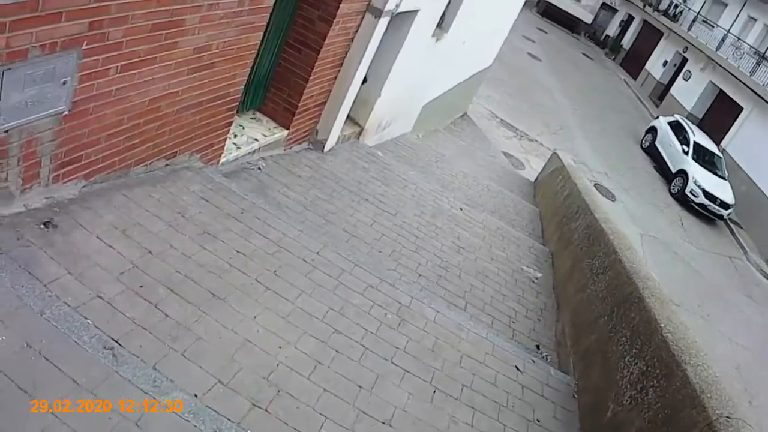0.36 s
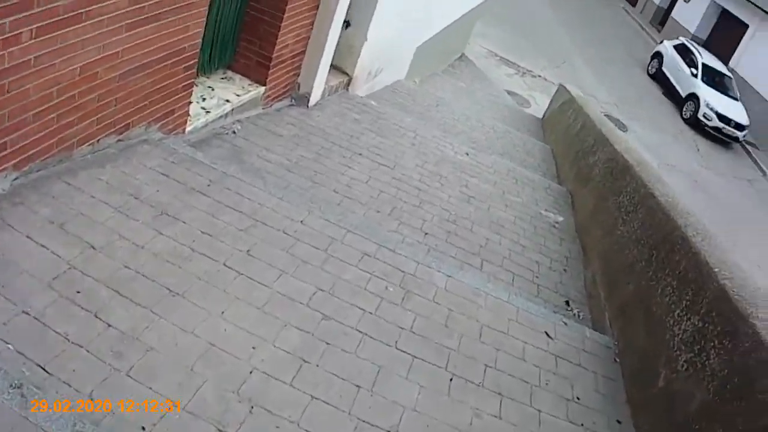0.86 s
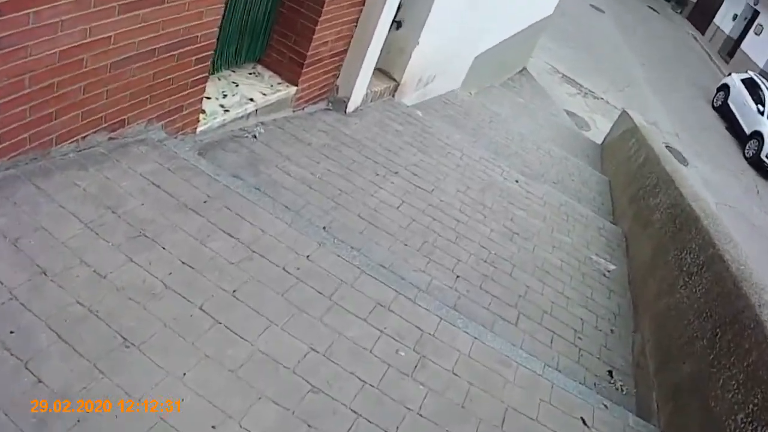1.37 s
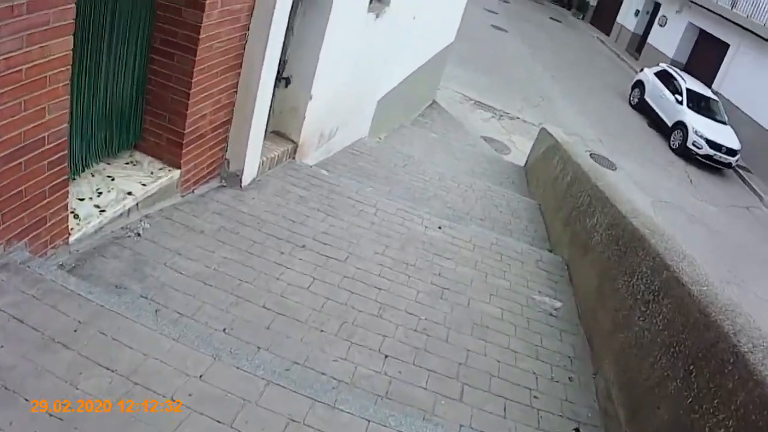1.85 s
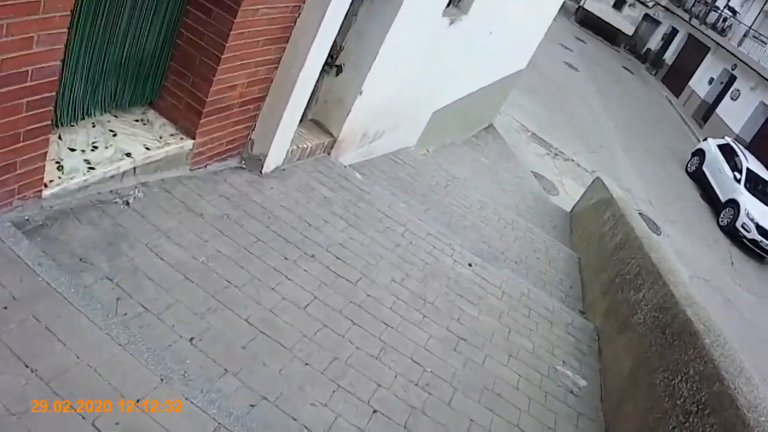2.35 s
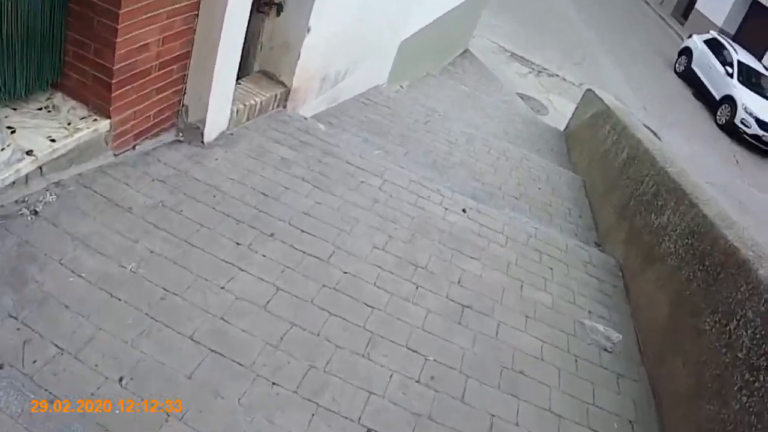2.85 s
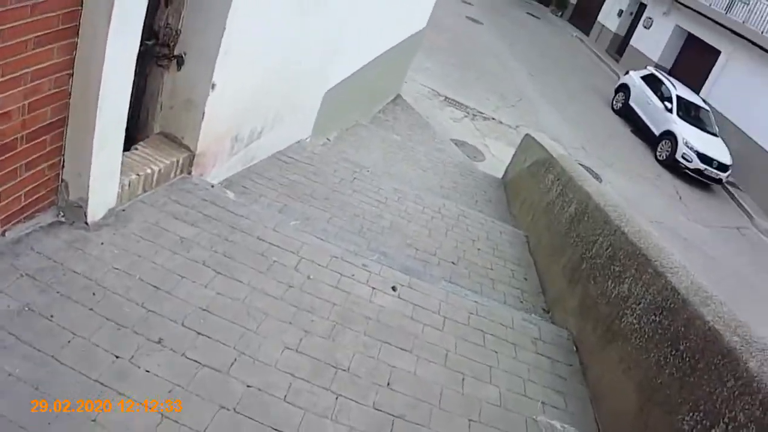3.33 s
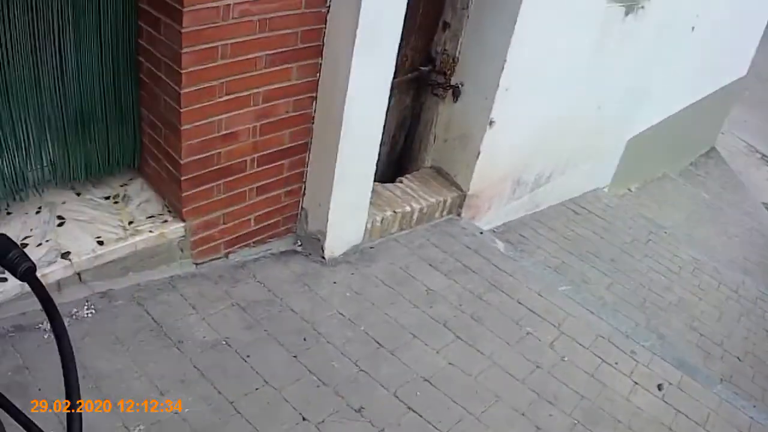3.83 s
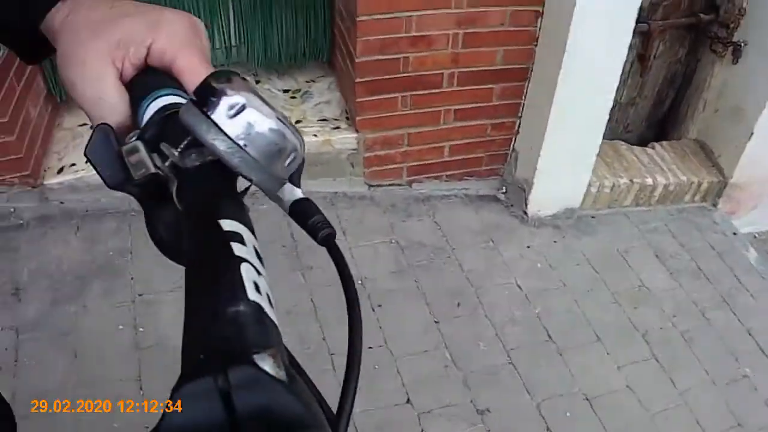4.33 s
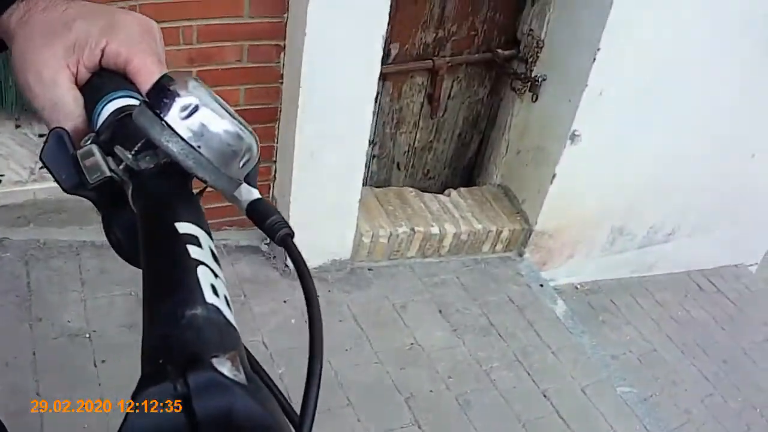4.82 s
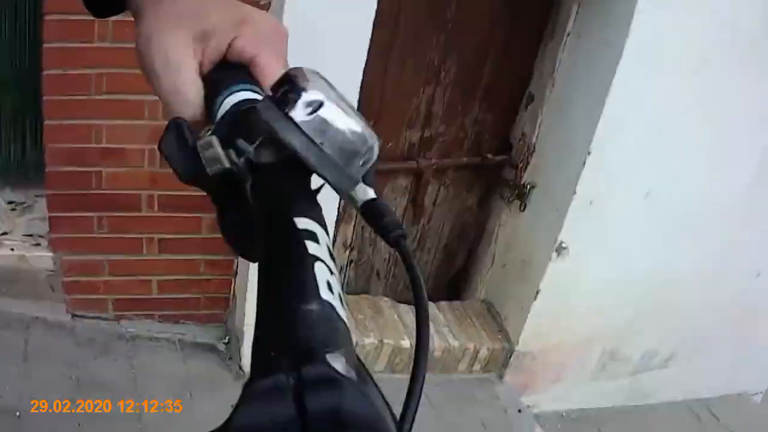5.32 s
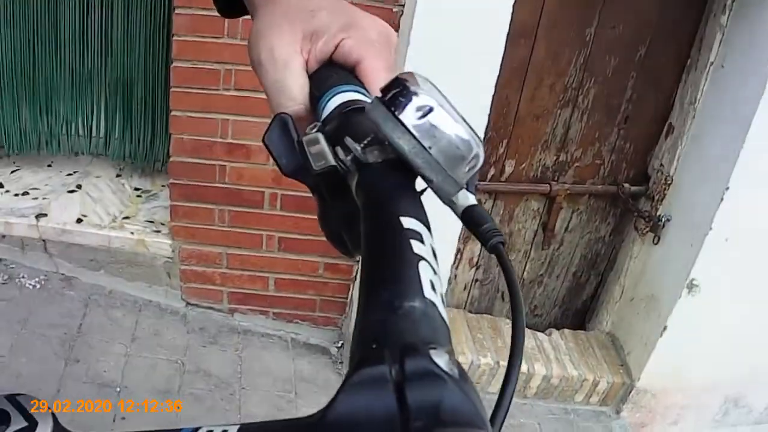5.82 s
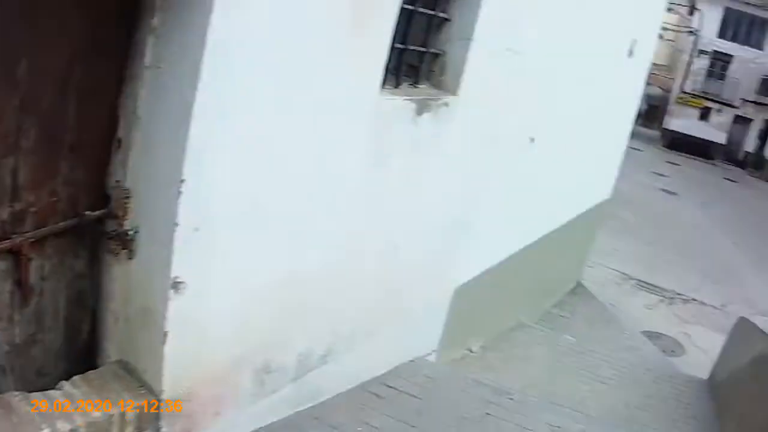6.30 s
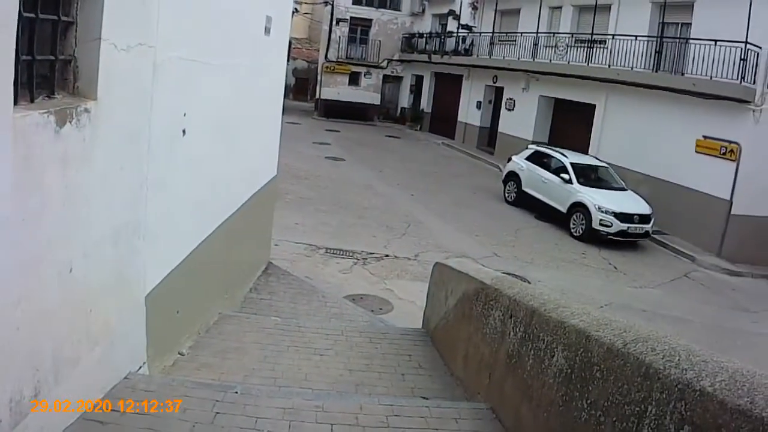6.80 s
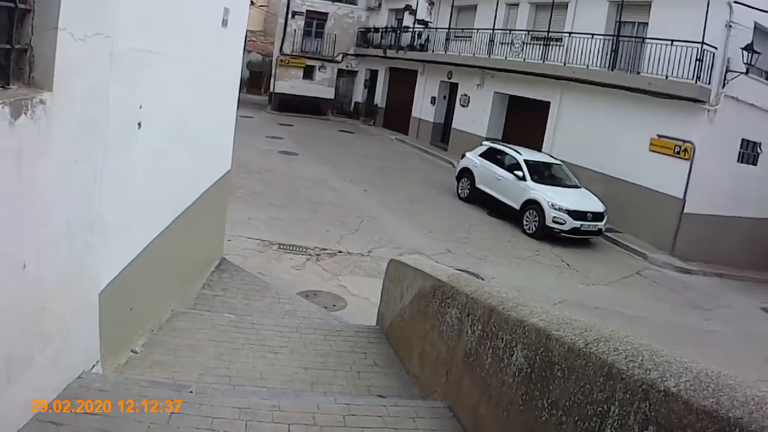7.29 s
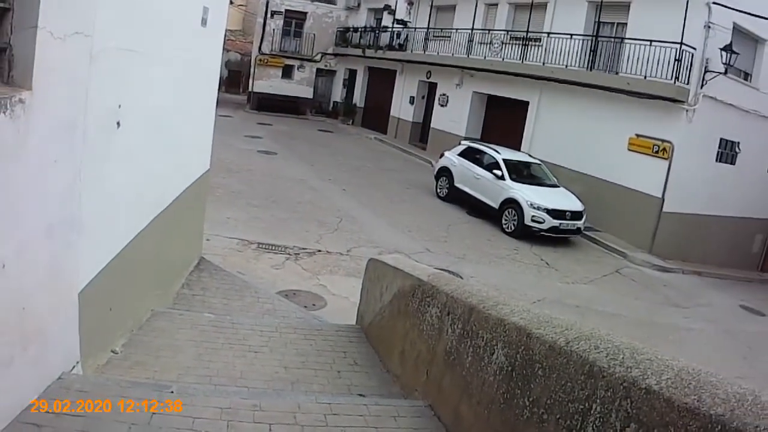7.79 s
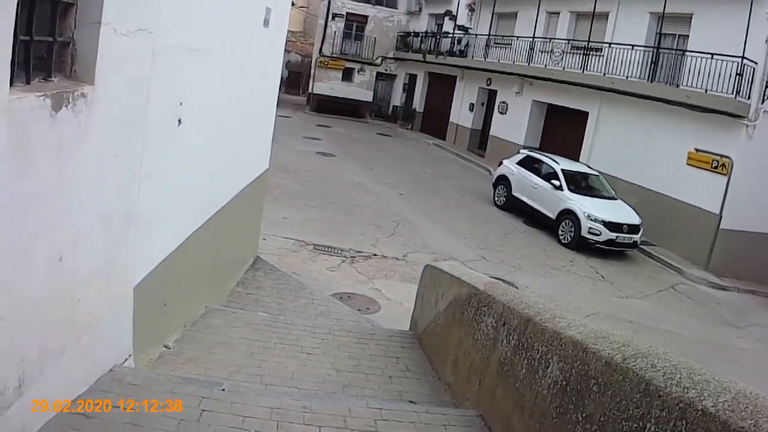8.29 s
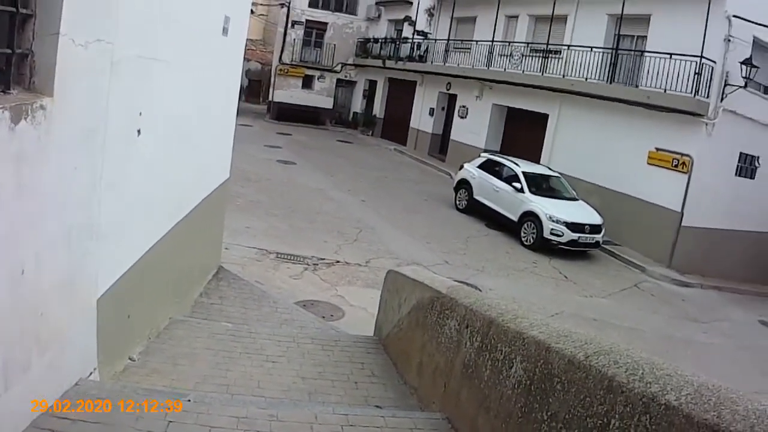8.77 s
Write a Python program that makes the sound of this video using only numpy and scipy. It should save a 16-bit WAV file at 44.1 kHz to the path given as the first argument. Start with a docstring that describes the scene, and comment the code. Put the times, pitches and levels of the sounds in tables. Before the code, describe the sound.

Quiet, regular metallic ticks of a bicycle wheel open the scene, broken by clusters of boxy knocks and low thumps from stone steps. A very faint bird chirps far off. The blows grow closer, overload in one brief loud crash, then turn to gritty rubbing and lighter knocks. Mono, muffled, close microphone in a plastic case, outdoors in a quiet street.

```python
"""A bicycle is walked down stone steps; a small camera in a closed plastic housing is clamped to its handlebar.
The freewheel ticks from the start, a far bird chirps between 1 and 2 s, and each landing jolts the frame.
Noisy contact forces ring banks of modes as knocks and thuds; a slow sine sways the handlebar after a landing.
From 5.3 s the hardest jolts overload the input; then sliding fingers and tyres rasp between softer blows.
Tyres rub in swells, strongest near 5.5 s, as shaken modes; hiss and a thin whine, filtered noise, run throughout."""
import sys
import numpy as np
from scipy import signal
from scipy.fft import rfft, irfft
from scipy.io import wavfile
from scipy.ndimage import map_coordinates

SR = 44100
rng = np.random.default_rng(int(sys.argv[2]) if len(sys.argv) > 2 else 0)


def file_out(sig):
    """Save sig as 16-bit WAV at sys.argv[1]."""
    # one column per channel
    cols = np.atleast_2d(sig).T
    # limit, then scale
    lim = np.clip(cols, -1, 1)
    pcm = np.round(lim * 32767).astype(np.int16)
    wavfile.write(sys.argv[1], SR, pcm)


def volts_from_db(level):
    """Convert decibel levels to linear amplitude ratios."""
    exponent = np.asarray(level, float) / 20
    return 10 ** exponent


N = 403515

# hard contacts: (time [s], housing ring peak [dB], mount [dB re housing], treble [dB re housing], contact t60 [s])
KNOCK_BLOWS = [(0.794, -29, -1, -17.5, 0.045), (0.806, -24, -30, -15, 0.054), (0.845, -29, 1, -15.5, 0.085),
               (0.859, -15, -24.5, -13.5, 0.047), (0.883, -19.5, -23, -15.5, 0.027),
               (0.908, -35, -13, -10.5, 0.017), (0.924, -45, -8, -3, 0.031), (1.392, -27, 5, -23, 0.049),
               (1.44, -16.5, -21, -12.5, 0.034), (1.453, -24, -11, -15, 0.048),
               (1.469, -25, -13, -17, 0.074), (1.724, -29.5, -4.5, -9.5, 0.046),
               (1.769, -30, 5.5, -15, 0.093), (1.781, -23.5, -23, -7.5, 0.021),
               (1.825, -27, -6, -31, 0.044), (1.929, -21.5, -4, -12.5, 0.046),
               (1.963, -34.5, -6, -39, 0.046), (2.734, -22, 1.5, -6, 0.065), (2.759, -28, 3.5, -16, 0.096),
               (2.785, -39, 0, -2, 0.018), (2.793, -14, -1.5, -25, 0.045), (2.807, -26, -1, 0.5, 0.027),
               (2.844, -27.5, -23, -14, 0.041), (2.857, -28, -10, -7, 0.046), (2.875, -33, 4, -12, 0.092),
               (2.902, -31, 1.5, -20, 0.058), (2.926, -15, -9, -13.5, 0.036),
               (3.089, -37, -3.5, -15.5, 0.032), (3.301, -35.5, -8, -7, 0.066),
               (3.333, -16.5, -9, -14, 0.039), (3.353, -29, -2, -21, 0.053), (3.455, -22.5, -8, -13, 0.043),
               (3.492, -36, -11, -28, 0.023), (3.586, -26.5, -7.5, -13, 0.054), (3.648, -27, 6, 0, 0.026),
               (3.664, -26.5, -3, -9, 0.048), (3.674, -24, -11, -14.5, 0.15), (3.716, -24, -9, -10, 0.097),
               (3.76, -13.5, -4, -13.5, 0.018), (3.789, -28.5, -5.5, -11, 0.1),
               (3.881, -38.5, 2.5, -9, 0.07), (3.909, -26.5, -8.5, -14.5, 0.055),
               (4.066, -39.5, -1, -6.5, 0.095), (4.317, -32.5, -6, -17, 0.011),
               (4.409, -33, -4.5, -10.5, 0.037), (4.454, -41.5, 3, -1, 0.05),
               (4.526, -17.5, -6, -17.5, 0.075), (4.554, -19.5, -12, -14, 0.093),
               (4.572, -10.5, -2, -2, 0.021), (4.594, -5.5, -15, -9, 0.024),
               (4.623, -14.5, -1, -12.5, 0.073), (4.661, -20.5, 1, -9, 0.015),
               (4.677, -15, -33, -11, 0.024), (4.696, -24, -4, -18, 0.099), (4.732, -33, -4, -17, 0.02),
               (4.78, -26, -14, -12.5, 0.021), (4.789, -24, -3, -9, 0.055), (4.816, -26.5, -1, -11, 0.018),
               (4.841, -26.5, -14, -12, 0.024), (5.134, -29, 0.5, -18, 0.067), (5.234, -27, -6, -14, 0.33),
               (5.305, -18, 5, 4, 0.031), (5.311, -1.5, -27, -24, 0.014), (5.319, -12.5, -5, -6.5, 0.026),
               (5.337, -8.5, -7, -3, 0.028), (5.347, 4, -1.5, -7.5, 0.015), (5.371, -11.5, -19, -8, 0.0067),
               (5.388, -13.5, 2, 1.5, 0.013), (5.406, -13.5, -23, -31, 0.028), (5.426, -23, -23, -5, 0.015),
               (5.449, -11, -24, -8.5, 0.049), (5.465, -16, 3.5, 2, 0.035), (5.479, -10, 3, -18, 0.023),
               (5.492, 3, -2.5, -5.5, 0.025), (5.502, -6.5, 2.5, -7, 0.014),
               (5.518, -3, -20.5, -14.5, 0.015), (5.527, 1, -1, -1, 0.025), (5.533, 4, -28, -4, 0.012),
               (5.551, -0.5, -24, -16, 0.01), (5.577, -6.5, -29, -13, 0.018),
               (5.596, -19.5, -11, -2.5, 0.015), (5.623, -12, -16, -15, 0.015),
               (5.641, -19.5, -25, -32, 0.016), (5.653, -23, 3.5, -4, 0.021),
               (5.774, -32, -2.5, -34, 0.047), (5.789, -37.5, -3, -1.5, 0.018), (6.052, -36, 5, 7, 0.12),
               (6.136, -19.5, -22, -7.5, 0.021), (6.171, -37.5, -7, 11, 0.025),
               (6.202, -30.5, -2, 15.5, 0.011), (6.236, -8.5, -2.5, -16, 0.0063),
               (6.251, -21, -9, -4, 0.019), (6.274, -17.5, 0, -26, 0.0078), (6.317, -19, -10, 6.5, 0.025),
               (6.326, -20.5, -1.5, 4, 0.021), (6.382, -18, -6.5, -7, 0.0096), (6.461, -34, 5, 6.5, 0.029),
               (6.522, -38, -3, 5, 0.03), (6.597, -33.5, -5, 1, 0.046), (6.738, -40, -3, 15.5, 0.016),
               (6.746, -37, 4.5, 16, 0.021), (6.762, -13.5, 1.5, -1, 0.018), (6.974, -41, 14.5, -35, 0.099),
               (7.075, -26, -12, -26, 0.066), (7.172, -14.5, 0, -18, 0.05), (7.186, -17, 1, -23, 0.043),
               (7.206, -21, -4, -27, 0.027), (7.22, -19, 0, -17, 0.046), (7.273, -22.5, -3.5, -13.5, 0.052),
               (7.312, -31.5, -2.5, -4.5, 0.053), (7.353, -27, 6, -41, 0.05),
               (7.379, -30.5, -1.5, -20, 0.087), (7.631, -24.5, 2.5, -2.5, 0.018),
               (7.636, -22, -14, -9, 0.049), (7.675, -34.5, 2.5, -34.5, 0.02),
               (7.723, -27.5, 1.5, -37, 0.069), (7.756, -36.5, 1, -22, 0.049), (7.814, -35, 6.5, -2, 0.033),
               (7.853, -25, -8, -22, 0.028), (7.873, -28, -20, -29, 0.032), (7.958, -44, 20, -39, 0.039),
               (8.049, -44, 10.5, -15.5, 0.024), (8.111, -39, 3, -24, 0.1), (8.227, -35, -21, 1, 0.0092),
               (8.338, -43.5, -12, 1.5, 0.024), (8.387, -45.5, -6.5, 11.5, 0.026),
               (8.456, -50.5, 9.5, -3, 0.012), (8.467, -52, 9, -3, 0.01), (8.511, -43, -13.5, -18, 0.078),
               (8.726, -42.5, 2, -21, 0.085), (8.767, -44.5, 14.5, 2, 0.011), (8.834, -45, 15.5, -1, 0.02),
               (8.858, -22, 10, -3, 0.0046), (8.975, -24.5, 0.5, 8, 0.015),
               (9.02, -26.5, -23.5, 1.5, 0.043), (9.052, -31.5, -2, -37, 0.056)]
# dull jolts through the frame: (time [s], frame ring peak [dB], push t60 [s])
JOLTS = [(0.18, -47.5, 0.084), (0.235, -44.5, 0.18), (0.44, -43, 0.41), (0.78, -22, 0.22),
         (0.859, -17, 0.092), (0.887, -15, 0.039), (1.379, -20.5, 0.17), (1.443, -18, 0.14),
         (1.754, -27.5, 0.064), (1.798, -32, 0.28), (2.723, -16, 0.083), (2.79, -20.5, 0.24),
         (2.844, -24.5, 0.63), (2.9, -25, 0.22), (3.091, -35, 0.13), (3.269, -28, 0.091),
         (3.296, -17.5, 0.064), (3.633, -22, 0.46), (3.673, -20, 0.038), (3.759, -21.5, 0.014),
         (3.791, -29, 0.028), (4.517, -17, 0.13), (4.594, -9.5, 0.053), (4.66, -19.5, 0.09),
         (4.779, -25, 0.18), (4.836, -21.5, 0.011), (5.134, -26.5, 0.07), (5.257, -15, 0.1),
         (5.309, -5.5, 0.1), (5.342, -1, 0.064), (5.454, -5, 0.093), (5.495, -2, 0.086), (5.551, -7, 0.015),
         (5.592, -9.5, 0.029), (6.056, -26, 0.091), (6.135, -19.5, 0.026), (6.234, -18, 0.015),
         (6.27, -20, 0.019), (6.314, -19, 0.029), (6.761, -14, 0.01), (6.977, -28.5, 0.069),
         (7.074, -14.5, 0.046), (7.164, -9, 0.11), (7.228, -10, 0.039), (7.273, -18.5, 0.036),
         (7.312, -23.5, 0.078), (7.356, -34, 0.14), (7.636, -12, 0.042), (7.72, -28, 0.11),
         (7.816, -32, 0.046), (7.857, -27, 0.049), (7.908, -28.5, 0.15), (7.956, -19, 0.13),
         (8.107, -28.5, 0.085), (8.856, -30, 0.025), (8.971, -20, 0.045), (8.995, -14, 0.098),
         (9.03, -25, 0.039)]
# a wheel lands on the next step, or the bicycle is swung round:
# (time [s], boom peak [dB], handlebar swing peak before the grip's waver [dB])
STEP_LANDINGS = [(0.029, -61, -62), (0.781, -25.5, -45.5), (1.38, -24, -40.5), (1.756, -24.5, -50.5),
                 (2.726, -21.5, -42.5), (3.279, -30, -44.5), (3.633, -26.5, -47.5), (4.522, -21.5, -38),
                 (4.779, -35, -56), (5.309, -23, -41.5), (5.496, -18, -35), (6.06, -33, -47.5),
                 (6.759, -36, -45), (7.165, -22.5, -49), (7.639, -53, -54), (7.96, -50.5, -50),
                 (8.861, -42, -47.5)]
# mode groups from low to high, before random spread and retuning: (frequency [Hz], relative gain [dB], t60 [s])
DEEP_MODES = [(45.4, 2.5, 0.075), (74, -1.5, 0.27), (100, -0.5, 0.15), (127, 2, 0.085)]
FRAME_MODES = [(172, -10, 0.085), (151, -7.5, 0.053), (205.9, -7, 0.15), (242, -2, 0.083),
               (294.9, -3, 0.098), (328.8, -11, 0.2)]
MOUNT_MODES = [(345.3, -4, 0.041), (547.6, -8.5, 0.13), (615.7, -9, 0.09), (757, -3.5, 0.053),
               (833, -5.5, 0.014)]
HOUSING_MODES = [(1098, -3, 0.02), (1134, 0, 0.028), (1262, 3, 0.025), (1341.4, 0, 0.023),
                 (1495, -8.5, 0.052), (1407, -15.5, 0.012)]
SKIN_MODES = [(1720, 0, 0.0037), (2212, 2.5, 0.0079), (2825, 0, 0.0058), (3210, -0.5, 0.0039),
              (3600, -3, 0.011), (4270, -10.5, 0.0078)]
EDGE_MODES = [(5010, 4.5, 0.008), (6030, 3.5, 0.01), (7200, -4, 0.0055), (8800, -5.5, 0.00094),
              (10800, -6, 0.002)]


def rms_one(x):
    """Scales a signal to unit rms."""
    return x / np.sqrt(np.mean(x ** 2) + 1e-20)


def cut(x, low_hz, high_hz):
    """Steep band edges keep the valleys between the groups dark."""
    return signal.sosfilt(signal.butter(4, [low_hz, high_hz], "band", fs=SR, output="sos"), x)


def low_pass(x, hz):
    """Second-order smoothing."""
    return signal.sosfilt(signal.butter(2, hz, fs=SR, output="sos"), x)


def clumped(clump_db, clump_hz):
    """A gain that wavers at random, by clump_db rms, no faster than about clump_hz."""
    return volts_from_db(clump_db * rms_one(low_pass(rng.standard_normal(N), clump_hz)))


def ring(force, modes, spread_db=0):
    """Two-pole resonators: each row of force sets all modes ringing, with strengths of its own."""
    out = 0
    chance = rng.standard_normal((len(force), len(modes)))
    for k, (hz, level_db, t60_s) in enumerate(modes):
        r = volts_from_db(-60 / (t60_s * SR))
        w = 2 * np.pi * hz / SR
        gain = (-1) ** k * volts_from_db(level_db + spread_db * chance[:, [k]]) * np.sqrt(1 - r * r)
        resonator = [1, -2 * r * np.cos(w), r * r]
        out = out + gain * signal.lfilter([0, np.sin(w)], resonator, force + 1e-18)
    return out


def contacts(t60_s, rise_s, tick, rattle_db, linger):
    """One 0.2 s push a row: a first touch, noise that swells and dies, loose parts rattling in sparse grains."""
    t = np.arange(SR // 5) / SR
    t60_s = np.clip(t60_s, .002, .3)[:, None]
    force = (1 - np.exp(-t / rise_s)) * volts_from_db(-60 * t / t60_s) * rng.standard_normal((len(t60_s), len(t)))
    grains = rng.standard_normal(force.shape) * (rng.random(force.shape) < 600 / SR)  # 600 per s
    force += volts_from_db(rattle_db - 60 * t / (linger * t60_s)) * grains
    force[:, 0] = tick
    return force


def retuned(rows, spread):
    """The grip stiffens or slackens: each row is read a little faster or slower, at its own pitch."""
    row, i = np.indices(rows.shape)
    speed = rng.normal(1, spread, (len(rows), 1))
    return map_coordinates(rows, [row, i * speed], order=3)


def gripped(rows, t60_s):
    """The hand on the housing damps the ringing: short blows die sooner."""
    return rows * volts_from_db(-60 * np.arange(rows.shape[-1]) / SR / t60_s[:, None])


def place(times_s, peak_db, rows):
    """Lays the rows out in time, each at its peak level."""
    out = np.zeros(N + rows.shape[1])
    rows = rows * (volts_from_db(peak_db) / np.abs(rows).max(axis=1))[:, None]
    for s, row in zip(times_s, rows):
        out[round(s * SR):][:len(row)] += row
    return out[:N]


def knocks():
    """One contact force drives all groups; the table sets their balance, and hard sharp blows reach the top."""
    sharp_t60_s = 0.014  # the first click is weaker for contacts longer than this, stronger for shorter
    soft_treble = 0.4  # share of the first click that reaches the treble modes
    s, peak_db, mount_db, treble_db, t60_s = np.transpose(KNOCK_BLOWS)
    tick = 21.0 * np.sqrt(sharp_t60_s / t60_s)
    force = contacts(t60_s, rise_s=0.001, tick=tick, rattle_db=1.5, linger=4.0)[:, :SR // 8]
    gritty = force * np.r_[soft_treble, np.ones(force.shape[1] - 1)]
    top_db = 1.22 * (peak_db + treble_db) + 0.17 * treble_db - 16.5
    # modes, force, peak [dB], strength spread [dB], band [Hz]
    groups = [(HOUSING_MODES, force, peak_db, 2.8, 700, 1900),
              (MOUNT_MODES, force, peak_db + mount_db, 4.5, 300, 1200),
              (SKIN_MODES, gritty, peak_db + treble_db, 3.5, 1500, 5000),
              (EDGE_MODES, gritty, top_db, 5.0, 4000, 12500)]
    out = 0
    for modes, push, db, spread_db, low_hz, high_hz in groups:
        soft_push = cut(push, 100, 9000)  # a contact is too soft to carry more
        rung = retuned(ring(soft_push, modes, spread_db), spread=0.025)
        out = out + place(s, db, gripped(cut(rung, low_hz, high_hz), 4.0 * t60_s))
    return out


def thuds():
    """Slow pushes move the low modes and spill into the mount."""
    s, peak_db, t60_s = np.transpose(JOLTS)
    force = contacts(t60_s, rise_s=0.013, tick=9.0, rattle_db=4.0, linger=6.0)
    force = cut(force, 15, 1490)  # a jolt is softer than a knock
    # modes, peak [dB], band [Hz]
    groups = [(FRAME_MODES, peak_db, 85, 600),
              (DEEP_MODES, peak_db - 18.5, 30, 200),
              (MOUNT_MODES, peak_db - 12.5, 300, 1500)]
    out = 0
    for modes, db, low_hz, high_hz in groups:
        rung = retuned(ring(force, modes, spread_db=3.0), spread=0.05)
        out = out + place(s, db, gripped(cut(rung, low_hz, high_hz), 2.6 * t60_s))
    return out


def booms():
    """The weight of a landing moves the deepest modes."""
    s, boom_db, _ = np.transpose(STEP_LANDINGS)
    t60_s = np.full(len(s), 0.2)
    force = contacts(t60_s, rise_s=0.0016, tick=5.8, rattle_db=1.5, linger=5.3)
    rung = cut(ring(force, DEEP_MODES, spread_db=-0.5), 32, 280)
    return place(s, boom_db, gripped(rung, 23.0 * t60_s))


def sway(mean_hz=32.72, rise_s=0.14, t60_s=1.5):
    """After each landing the handlebar swings as a slowly dying sine, kept for 1 s."""
    s, _, peak_db = np.transpose(STEP_LANDINGS)
    t = np.arange(SR) / SR
    hz = mean_hz * rng.normal(1, 0.044, (len(s), 1))
    swings = (1 - np.exp(-t / rise_s)) * volts_from_db(-60 * t / t60_s) * np.sin(2 * np.pi * hz * t)
    return place(s, peak_db, swings) * clumped(clump_db=2.5, clump_hz=8)  # the grip keeps shifting


def freewheel():
    """The pawl drops over a tooth and rings modes of its own."""
    # pawl drops: (time [s], peak [dB])
    ticks = [(0.058, -36.5), (0.211, -37), (0.364, -35), (0.531, -38), (0.713, -38.5), (1.039, -40),
             (1.193, -36.5), (1.359, -36.5), (1.519, -32.5), (1.677, -34.5), (1.844, -38), (1.993, -39.5),
             (2.151, -45), (2.308, -41), (2.49, -40), (2.686, -36.5), (3.032, -38.5), (3.195, -40.5),
             (3.522, -41.5), (3.93, -39), (4.967, -42.5), (5.123, -41)]
    # pawl modes before spread and retuning: (frequency [Hz], relative gain [dB], t60 [s])
    pawl_modes = [(600, 7, 0.12), (809, 2.5, 0.063), (1264, -1, 0.029), (1485, -0.5, 0.026),
                  (2030, -6, 0.036), (2760, -10, 0.014), (3670, -10.5, 0.014), (4190, -17.5, 0.0037)]
    s, peak_db = np.transpose(ticks)
    force = contacts(np.full(len(s), 0.035), rise_s=0.0012, tick=9.0, rattle_db=-13.5, linger=1.4)
    rung = retuned(ring(force, pawl_modes, spread_db=1.8), spread=0.025)
    return place(s, peak_db, cut(rung, 400, 4700))


def rattle_level(s, db, t60_s):
    """A level that swells at each blow and dies away."""
    blows = np.full(N, 1e-18)
    np.add.at(blows, (s * SR).astype(int), volts_from_db(db))
    level = signal.lfilter([1], [1, -volts_from_db(-60 / (t60_s * SR))], blows)
    return low_pass(level, 60)  # sets how fast the rattle builds


def rubbing(slips_per_s=2500, grain_db=2.2, grit_share=0.45):
    """Small clumped slips shake the modes, rising and falling as tyres roll and hands shift, more after blows."""
    # shake of the housing, strongest near 5.5 s: (time [s], level [dB])
    rolling_curve = [(0.0, -75.5), (1.91, -58.5), (2.16, -72), (3.82, -64), (4.3, -70.5), (4.64, -69.5),
                     (5.17, -64.5), (5.48, -28.5), (5.58, -41), (5.76, -53), (6.06, -59.5), (6.24, -55.5),
                     (6.6, -60.5), (6.88, -78), (7.21, -46), (7.59, -66.5), (7.85, -51.5), (8.87, -70),
                     (9.15, -73)]
    rolling = volts_from_db(np.interp(np.arange(N) / SR, *np.transpose(rolling_curve)))
    thud_s, thud_db = np.transpose(JOLTS)[:2]
    knock_s, knock_db = np.transpose(KNOCK_BLOWS)[:2]
    # loose parts rattle on, at a level against the blow
    frame = rolling * volts_from_db(4) + rattle_level(thud_s, thud_db - 28, t60_s=0.48)
    housing = rolling + rattle_level(knock_s, knock_db - 26, t60_s=0.13)
    sizes = volts_from_db(grain_db * np.minimum(rng.exponential(1, N), 5)) * rng.choice([-1, 1], N)
    slips = sizes * (rng.random(N) < slips_per_s / SR) * clumped(clump_db=4.0, clump_hz=52.3)
    slips = slips[None]
    grit = slips * (rng.random(N) < grit_share)  # slips sharp enough to reach the treble modes
    # modes, force, shake, level [dB], band [Hz]
    layers = [(DEEP_MODES, slips, frame, -7, 45, 200),
              (FRAME_MODES, slips, frame, 0, 110, 500),
              (MOUNT_MODES, slips, housing, -0.6, 300, 1200),
              (HOUSING_MODES, slips + 1.7 * grit, housing, 0, 700, 1900),
              (SKIN_MODES, grit, housing, -14.5, 1500, 4700)]
    out = 0
    for modes, force, shake, db, low_hz, high_hz in layers:
        out = out + shake * volts_from_db(db) * rms_one(cut(ring(force, modes)[0], low_hz, high_hz))
    return out


def fingers(edge_s=0.012):
    """Strokes set in and stop quickly; gritty friction wavers in pressure, the top end also on its own."""
    # fingers and tyres sliding:
    # (start [s], end [s], skin level [dB], top end [dB re skin], housing ring [dB re skin])
    strokes = [(0.423, 0.497, -103.5, -30, 41.6), (4.228, 4.343, -59.5, -35, 11.8),
               (5.488, 5.573, -46.5, -5.5, 1), (6.042, 6.118, -46.5, -13.5, 1), (6.129, 6.17, -50, -22, 1),
               (6.253, 6.334, -38, -26, 1), (6.338, 6.457, -55, -27, 1.3), (6.484, 6.548, -49.5, -12, 2.1),
               (6.551, 6.701, -51.5, -31, 1.3), (6.691, 6.742, -46, -15, 0.79),
               (6.782, 6.809, -39.5, -16.5, 0.84), (7.149, 7.25, -54.5, -35, 17.6),
               (7.265, 7.338, -64, -26, 19), (7.353, 7.4, -75, -12, 10), (7.635, 7.729, -66, -33.5, 5),
               (7.741, 7.81, -65.5, -13, 7), (7.855, 7.878, -63, -29, 17), (7.917, 8.018, -71.5, -23, 19),
               (8.034, 8.166, -57.5, -34, 3.7), (8.189, 8.236, -61, -34, 11.4),
               (8.311, 8.396, -61, -13, 3.5), (8.389, 8.447, -54, -16.5, 0.88),
               (8.495, 8.658, -64, -17.5, 1.4), (8.72, 8.791, -54, -20, 1.3), (8.829, 8.881, -42, -25, 1.1),
               (8.962, 9.042, -48.5, -16, 1.6), (9.046, 9.147, -57, -23, 4.5)]
    t = np.arange(N) / SR
    skin_gain, top_gain, housing_gain, rasp_gain = np.zeros((4, N))
    for start_s, end_s, level_db, top_db, housing_db in strokes:
        on = np.clip(np.minimum(t - start_s, end_s - t) / edge_s, 0, 1)
        skin_gain += on * volts_from_db(level_db)
        top_gain += on * volts_from_db(level_db + top_db)
        housing_gain += on * volts_from_db(level_db + housing_db)
        rasp_gain += on * volts_from_db(0.45 * level_db - 37)  # grows slowly with pressure: light strokes are mostly rasp
    pressure = clumped(clump_db=2.5, clump_hz=200) * clumped(clump_db=2.5, clump_hz=26)
    friction = rng.standard_normal((2, 1, N)) * pressure
    friction += rng.standard_normal(N) * 6.0 * (rng.random(N) < 250 / SR)  # the skin sticks and snaps free
    body_force, fine_force = friction
    skin = 0
    for mode in SKIN_MODES:  # the colour shifts as the contact moves
        skin = skin + ring(body_force, [mode])[0] * clumped(clump_db=4.0, clump_hz=12)
    housing, mount, frame = [rms_one(ring(body_force, modes)[0])
                             for modes in (HOUSING_MODES, MOUNT_MODES, FRAME_MODES)]
    body = housing + volts_from_db(-1.5) * mount + volts_from_db(-4.0) * frame
    rasp = rms_one(cut(fine_force[0], 3200, 4000))
    top = clumped(clump_db=3.0, clump_hz=25) * cut(ring(fine_force, EDGE_MODES)[0], 3100, 13000)
    return skin_gain * rms_one(skin) + housing_gain * body + rasp_gain * rasp + top_gain * rms_one(top)


def bird(length_s=0.045):
    """Short gliding chirps, blurred by distance into hoarse bands."""
    # far chirps: (time [s], peak [dB], start pitch [Hz], glide [Hz])
    chirps = [(0.973, -65, 4650, -300), (1.579, -61, 4530, 301), (2.03, -66, 4600, -200)]
    s, peak_db, start_hz, glide_hz = np.transpose(chirps)
    t = np.arange(round(length_s * SR)) / SR
    hz = start_hz[:, None] + glide_hz[:, None] * t / length_s
    blur = low_pass(rng.standard_normal(hz.shape), 200)
    tone = np.sin(2 * np.pi * np.cumsum(hz, axis=1) / SR)
    return place(s, peak_db, blur * np.sin(np.pi * t / length_s) * tone)


def hiss(level_db=-62):
    """Street air and the microphone's own noise: noise coloured in its spectrum."""
    # noise colour before scaling to level_db rms: (frequency [Hz], relative density [dB per Hz])
    hiss_colour = [(60, -28.5), (234, 1.5), (460, -16.5), (600, -9.5), (1500, -24), (5000, -35.5),
                   (8500, -37), (12000, -39), (14000, -64.5)]
    hz, density_db = np.transpose(hiss_colour)
    grid_hz = np.fft.rfftfreq(N, 1 / SR) + 1
    colour = volts_from_db(np.interp(np.log(grid_hz), np.log(hz), density_db))
    return volts_from_db(level_db) * rms_one(irfft(rfft(rng.standard_normal(N)) * colour, N))


def whine():
    """Thin unsteady tones of the electronics: noise in bands 120 Hz wide."""
    # tones: (frequency [Hz], rms level [dB])
    whine_tones = [(7531, -99), (8306, -92)]
    return sum(volts_from_db(db) * rms_one(cut(rng.standard_normal(N), hz - 60, hz + 60)) for hz, db in whine_tones)


def scene():
    """Sums all sources into one channel."""
    blows = knocks() + thuds() + booms() + sway() + freewheel()
    friction = rubbing() + fingers()
    background = bird() + hiss() + whine()
    return (blows + friction + background)[None]


def roll_off(x):
    """The treble ends steeply here."""
    return signal.sosfilt(signal.butter(12, 15660, fs=SR, output="sos"), x)


def record(dry):
    """The hardest jolts overload the input and are cut flat; the converter dulls the top."""
    clipped = np.clip(dry, -1, 1)
    mix = low_pass(clipped, 13000)
    return roll_off(mix)


dry = scene()
out = record(dry)
file_out(out)
```